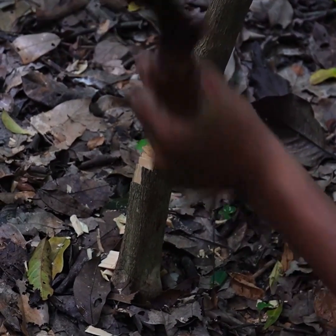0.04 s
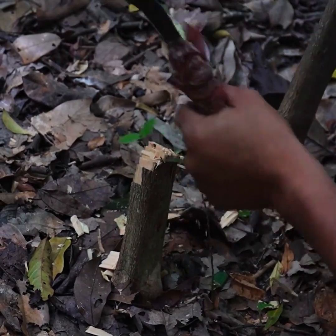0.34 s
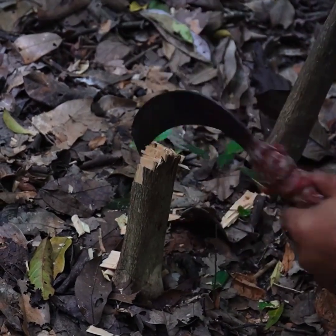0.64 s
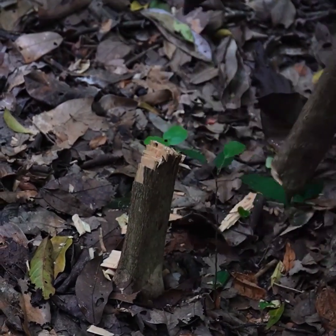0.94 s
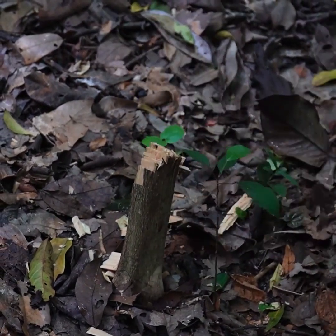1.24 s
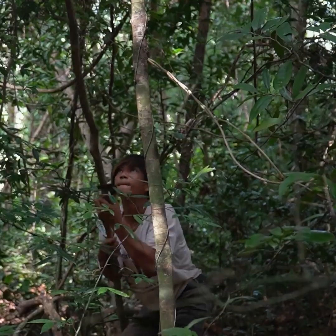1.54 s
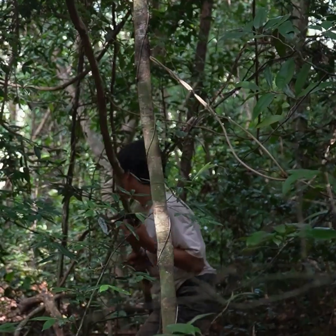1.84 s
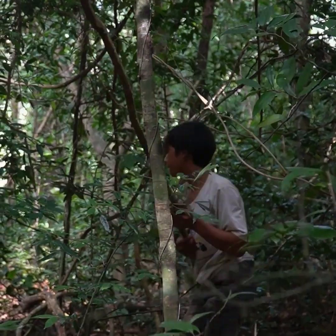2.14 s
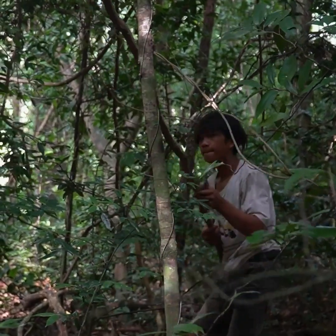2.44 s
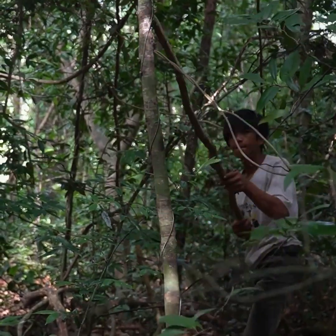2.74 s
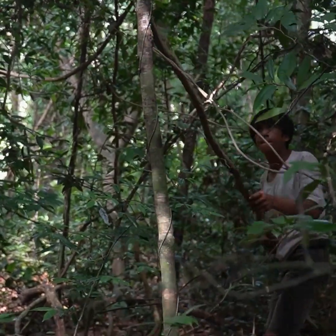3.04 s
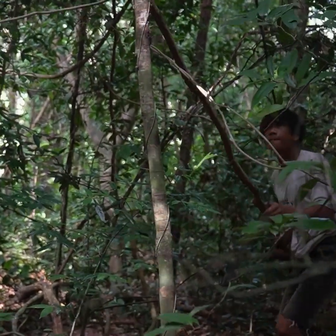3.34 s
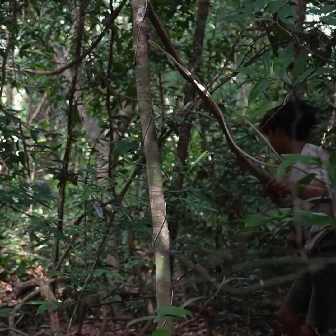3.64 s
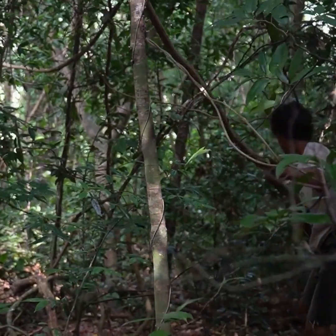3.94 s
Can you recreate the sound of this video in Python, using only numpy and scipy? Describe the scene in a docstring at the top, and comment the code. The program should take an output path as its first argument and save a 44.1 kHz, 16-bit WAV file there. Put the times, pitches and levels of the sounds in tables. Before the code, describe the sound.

A leafy sapling is dragged through forest undergrowth close by, rustling in swells with splintering snaps and a few dull knocks. Near the start a more distant bird gives two short whistles, and high insects hiss throughout.

```python
"""Leaves rustle and wood splinters close to the microphone: a chopped sapling is wrenched off its stump
and dragged through dense undergrowth. Its crown surges twice, a rush of leaf striking leaf, while twigs
brush past, snapping fibres ring the wood and the stem bumps the ground. Further into the forest a bird
whistles one rising and one falling note, and high insects hiss all around."""
import sys
import numpy as np
from scipy import signal
from scipy.fft import rfft, irfft
from scipy.io import wavfile

SR = 44100
rng = np.random.default_rng(int(sys.argv[2]) if len(sys.argv) > 2 else 0)


def log_audio(samples):
    """Write samples as a 16-bit WAV file to the path given in sys.argv[1]."""
    # one column per channel
    frames = np.atleast_2d(samples).T
    # limit to full scale, then quantise
    limited = np.clip(frames, -1, 1)
    pcm = np.round(limited * 32767).astype(np.int16)
    wavfile.write(sys.argv[1], SR, pcm)


N = 176400
T = np.arange(N) / SR
FREQS = np.maximum(np.fft.rfftfreq(N, 1 / SR), 1)

# stereo width of the nearby foliage: (frequency [Hz], side gain [dB])
LEAF_WIDTH = [(100, -23), (500, -12), (1400, -15.5), (2800, -12), (5000, -6.5), (14000, -2)]


def crown():
    """The crown dragged past, close up: countless leaves rush and tick, denser when pulled harder."""
    # rustle as the crown is pulled: (time [s], level [dB])
    pull_levels = [(0, -48), (.18, -47), (.25, -29), (.47, -30.5), (.7, -39.5), (.95, -42), (1.1, -33.5),
                   (1.24, -38), (1.39, -36.5), (1.54, -32), (1.66, -17), (1.745, -18.5), (1.775, -21.5),
                   (1.83, -19.5), (2.03, -27), (2.42, -32), (2.57, -34), (2.66, -30.5), (2.83, -35.5),
                   (3.0, -32.5), (3.12, -25), (3.27, -23), (3.33, -27), (3.58, -30.5), (3.72, -36),
                   (3.83, -36), (3.9, -34.5), (4, -38.5)]
    # tone of the leaves: (frequency [Hz], gain [dB])
    leaf_spectrum = [(40, -27), (100, -11), (200, -9.5), (300, -4.5), (420, -6), (650, -3), (1100, -3),
                     (1700, -1.5), (2600, -0.5), (4500, -3), (8000, -6), (12000, -9), (15500, -18.5)]
    crinkles_per_s, twig_ticks_per_s = 2500, 70  # at density 1
    rush_db, crinkle_db, twig_db = -3, -6.5, -15  # balance within the rustle
    flutter_db, band_wander_db, flutter_hz = 1.34, -0.07, 32
    pull = curve(pull_levels)
    white = rfft(rng.standard_normal((2, N)))
    octave = np.clip(np.floor(np.log2(FREQS / 250)), 0, 5)
    rush = sum(irfft(white * (octave == k), N) * from_db(band_wander_db * drift(flutter_hz))
               for k in range(6))
    density = np.sqrt(rms_one(pull))
    leaves = rms_one(crinkles(crinkles_per_s * density) / np.sqrt(density))
    twigs = rms_one(crinkles(twig_ticks_per_s * density) / np.sqrt(density))
    rustle = from_db(rush_db) * rms_one(rush) + from_db(crinkle_db) * leaves + from_db(twig_db) * twigs
    flutter = from_db(flutter_db * drift(flutter_hz))
    return widen(colour(rustle, leaf_spectrum), LEAF_WIDTH) * pull * flutter


def crinkles(per_s):
    """Leaf strikes leaf: brief ticks, each at a random pitch and place, as mid and side."""
    spread_db = 0.5
    sizes = from_db(spread_db * np.minimum(rng.exponential(1, N), 5)) * rng.choice([-1, 1], N)
    ticks = sizes * (rng.random(N) < per_s / SR)
    place, band = rng.standard_normal(N), rng.integers(0, 10, N)
    out = 0
    for k, hz in enumerate(np.geomspace(900, 14000, 10)):
        mid = ticks * (band == k)
        out = out + np.sqrt(hz) * rms_one(ring(np.array([mid, mid * place]), hz, t60=1.95 / hz))
    return rms_one(out)


def brushes():
    """Single leafy twigs swipe past the microphone in short, bright bursts of ticks."""
    # passing twigs: (time [s], length [s], level [dB])
    swipes = [(.196, .004, -29), (.333, 0.039, -22), (1.408, 0.024, -30), (1.576, 0.045, -27.5),
              (2.348, 0.02, -25.5), (2.393, 0.023, -28), (3.02, 0.028, -27.5), (3.365, 0.013, -28),
              (3.624, 0.021, -23), (3.866, 0.049, -31.5)]
    # tone of a swipe: (frequency [Hz], gain [dB])
    swipe_spectrum = [(200, -44), (1000, -1), (2800, 4), (6000, 4.5), (11000, 1.5), (15500, 3)]
    ticks = colour(crinkles(per_s=7000), swipe_spectrum)
    return widen(ticks, LEAF_WIDTH) * strokes(swipes, release_s=0.012)


def cracks():
    """Fibres fail in quick runs just right of centre: each snaps sharply and rings the wood."""
    # breaks, with levels as rms over 10 ms before panning and echoes: (time [s], length [s],
    # wood note [Hz], wood level [dB], wood t60 [s], snap centre [Hz], snap level [dB])
    breaks = [(0.2286, 0.0048, 2200, -21, 0.0017, 11000, -16.5),
              (0.293, 0.0052, 2400, -17.5, .0035, 6800, -22.5),
              (0.342, 0.00085, 2900, -25.5, 0.0064, 9000, -36), (0.349, 0.0056, 2630, -26, .004, 6000, -45),
              (0.3627, 0.00056, 2580, -25, .003, 6900, -28),
              (0.455, 0.0052, 1780, -23, 0.0048, 6100, -24.5), (.9110, 0.0042, 1430, -32, 0.02, 9700, -20),
              (0.9963, .0005, 2560, -34.5, .003, 4500, -45),
              (1.0486, 0.00087, 2400, -35.5, .003, 5000, -40),
              (1.2214, 0.0043, 1440, -32.5, 0.019, 6000, -50),
              (1.2876, 0.012, 2200, -31, 0.0079, 6000, -50), (1.475, 0.0056, 2150, -27, 0.0074, 10000, -31),
              (2.27, 0.0007, 2420, -53, .004, 6600, -21.5), (2.3945, .001, 2500, -39, .003, 6000, -30),
              (2.4346, 0.003, 2740, -43, 0.0028, 5800, -26.5),
              (2.5076, 0.0011, 1850, -34, 0.0026, 6000, -36), (2.645, .001, 2500, -43, .003, 6000, -33.5),
              (3.201, 0.0015, 2030, -20.5, 0.0064, 6000, -34),
              (3.2180, 0.0051, 2060, -22, 0.005, 4000, -42), (3.229, 0.0033, 1770, -26, 0.005, 4000, -45),
              (3.235, 0.0015, 1720, -19, 0.0044, 4000, -36), (3.5777, .001, 1930, -30.5, 0.0036, 6000, -39),
              (3.802, .001, 2410, -48, .003, 5960, -37.5), (3.8626, .0004, 1800, -51, .003, 8900, -19.5),
              (3.935, 0.0046, 1970, -32, 0.0021, 7000, -37)]
    # modes of the wood: (frequency over the note [ratio], gain [dB], t60 over the wood t60 [ratio])
    wood_modes = [(.38, -13.5, 0.65), (.76, -12, 0.45), (1, 2, 0.97), (1.37, -9, 0.34)]
    fibres_per_s, side_db, echo_db = 6000, -13.5, -6
    low_cut = signal.butter(2, 1180, "high", fs=SR, output="sos")
    out, t = np.zeros((2, N + SR)), T[:2048]
    to_10_ms = np.sqrt(.01 * SR / len(t))
    for start, length, wood_hz, wood_db, wood_t60, snap_hz, snap_db in breaks:
        fibres = rng.standard_normal((2, len(t))) * (rng.random(len(t)) < fibres_per_s / SR)
        mid, side = fibres * np.exp(-(t / length) ** 2)
        mid[0] = 2.5  # the first fibre goes hard
        fibres = stereo(mid, side * from_db(side_db))
        wood = sum(from_db(db) * ring(fibres, ratio * wood_hz, share * wood_t60)
                   for ratio, db, share in wood_modes)
        snap = signal.sosfilt(low_cut, ring(fibres, snap_hz, t60=0.00041) + fibres)
        crack = from_db(wood_db) * rms_one(wood) + from_db(snap_db) * rms_one(snap)
        i = int(start * SR)
        out[:, i:i + len(t)] += to_10_ms * crack
    direct = panned(out[:, :N], left_db=-2)
    return direct + from_db(echo_db) * tree_echoes(direct, t60=0.12)


def thuds():
    """The heavy stem bumps the ground and other branches: dull, broad knocks near the centre."""
    # bumps: (time [s], length [s], centre [Hz], level [dB])
    bumps = [(0.229, 0.0097, 170, -34), (0.291, 0.0049, 187, -33), (0.319, 0.083, 110, -45),
             (.749, 0.013, 302, -40), (1.476, 0.0048, 830, -29.5), (1.616, 0.047, 47.5, -42),
             (1.786, .06, 60, -46), (3.218, 0.021, 543, -34), (3.575, .006, 520, -36)]
    bandwidth_ratio, side_db = 1.4, -25
    out = 0
    for start, length, hz, db in bumps:
        t60 = np.log(1000) / (np.pi * bandwidth_ratio * hz)
        mid, side = ring(rng.standard_normal((2, N)), hz, t60)
        high_cut = signal.butter(2, 3 * hz, fs=SR, output="sos")
        body = signal.sosfilt(high_cut, stereo(mid, side * from_db(side_db)))
        out = out + rms_one(body) * strokes([(start, length, db)], release_s=0.0053)
    return out


def bird():
    """Two nearly pure whistles; the farther one is smeared by echoes among the trees."""
    # the rising whistle, then the falling one, each: (time [s], pitch [Hz], level [dB])
    notes = [
        [(.05, 2570, -47), (.082, 2720, -38), (.125, 2756, -30), (.164, 2800, -26.5), (.175, 2725, -28),
         (.184, 2810, -28), (.21, 2805, -23), (.228, 2650, -34)],
        [(.45, 2590, -26), (.48, 2586, -41), (.54, 2512, -31), (.565, 2586, -39), (.61, 2573, -37),
         (.655, 2493, -30.5), (.725, 2500, -51), (.765, 2420, -39.5), (.82, 2330, -43.5), (.88, 2330, -59)],
    ]
    # echo against direct sound: (near whistle [dB], far whistle [dB])
    echo_levels = [-10.5, 0.5]
    waver_hz, flutter_db = 11.1, 3.2
    out = 0
    for note, echo_db in zip(notes, echo_levels):
        times, hz, db = np.transpose(note)
        pitch = np.interp(T, times, hz) + waver_hz * drift(rate_hz=31)
        level = from_db(np.interp(T, times, db) + flutter_db * drift(rate_hz=40))
        singing = (T > times[0]) & (T < times[-1])
        song = np.sqrt(2) * level * singing * np.sin(2 * np.pi * np.cumsum(pitch) / SR)
        echo = from_db(echo_db)
        out = out + (song + echo * tree_echoes(song, t60=.3)) / np.hypot(1, echo)
    return out


def insects():
    """Many high stridulators around the microphone merge into a narrow, throbbing hiss."""
    # swell of the chorus: (time [s], level [dB])
    chorus_levels = [(0, -33.5), (.4, -34.5), (.72, -30.5), (.95, -33.5), (1.35, -33.5), (1.52, -29),
                     (2.0, -30), (2.45, -30), (2.85, -35), (3.2, -30), (3.55, -33), (3.8, -38), (4, -32.5)]
    # tone of the chorus: (frequency [Hz], gain [dB])
    chorus_spectrum = [(9000, -31.5), (10000, -6), (10170, -5), (10650, 1), (11150, -1), (11900, -4),
                       (13000, -8.5), (15500, -14.5)]
    side_db, throb_db = -7.5, 1.2
    mid, side = colour(rng.standard_normal((2, N)), chorus_spectrum)
    hiss = rms_one(stereo(mid, side * from_db(side_db)))
    return hiss * curve(chorus_levels) * from_db(throb_db * drift(rate_hz=40))


def air():
    """Still forest air behind everything: a quiet bed of noise, narrow in the bass and wide above."""
    # tone of the air: (frequency [Hz], gain [dB])
    air_spectrum = [(20, -25), (50, 2), (120, 0.5), (230, -7.5), (500, -15.5), (1200, -25), (2400, -4),
                    (3500, -12.5), (8000, -25.5), (15500, -9)]
    # its stereo width: (frequency [Hz], side gain [dB])
    air_width = [(30, -25), (120, -13), (500, 8), (2000, -3), (8000, 1)]
    return from_db(-42.5) * widen(colour(rng.standard_normal((2, N)), air_spectrum), air_width)


def tree_echoes(x, t60):
    """Diffuse echoes from trunks and leaves, different on each side of the microphone."""
    mid, side = rng.standard_normal((2, SR)) * from_db(-60 * T[:SR] / t60)
    tail = stereo(mid, side * .5)
    tail /= np.sqrt(np.sum(tail ** 2) / 2)
    return signal.fftconvolve(np.atleast_2d(x), tail, axes=1)[:, :N]


def ring(x, hz, t60):
    """One damped resonance that falls 60 dB in t60 seconds."""
    radius, angle = from_db(-60 / (t60 * SR)), 2 * np.pi * hz / SR
    return signal.lfilter([1, 0, -1], [1, -2 * radius * np.cos(angle), radius ** 2], x + 1e-18)


def strokes(rows, release_s, attack_s=0.0021):
    """Attack, hold and release for each (time [s], length [s], level [dB]) row."""
    return sum(from_db(db) * np.clip((T - start) / attack_s, 0, 1)
               * np.exp(-np.maximum(T - start - length, 0) / release_s) for start, length, db in rows)


def drift(rate_hz):
    """Random wander of rms 1, mostly slower than rate_hz."""
    return rms_one(irfft(rfft(rng.standard_normal(N)) / (1 + (FREQS / rate_hz) ** 2), N))


def curve(rows):
    """Gain along a (time [s], level [dB]) curve."""
    return from_db(np.interp(T, *np.transpose(rows)))


def colour(x, points):
    """Filter by a (frequency [Hz], gain [dB]) table."""
    hz, db = np.transpose(points)
    return irfft(rfft(x) * from_db(np.interp(np.log(FREQS), np.log(hz), db)), N)


def stereo(mid, side):
    """Left and right from mid and side."""
    return np.array([mid + side, mid - side])


def widen(mid_side, width):
    """Left and right at rms 1, with the side filtered by a width table."""
    mid, side = mid_side
    return rms_one(stereo(mid, colour(side, width)))


def panned(x, left_db):
    """Lean the sound by a left-minus-right level."""
    return np.array([x[0] * from_db(left_db / 2), x[1] * from_db(-left_db / 2)])


def from_db(db):
    """Decibels to gain."""
    return 10 ** (np.asarray(db) / 20)


def rms_one(x):
    """Scale to rms 1."""
    return x / np.sqrt(np.mean(x ** 2) + 1e-20)


def scene():
    """The sapling in front of the microphone, the forest around it."""
    # the crown starts a little to the right and comes to the centre: (time [s], left minus right [dB])
    crown_path = [(0, -1.2), (1.4, -1), (1.6, 0), (4, 0.5)]
    foliage = panned(crown() + brushes(), np.interp(T, *np.transpose(crown_path)))
    return foliage + cracks() + thuds() + bird() + panned(insects(), left_db=-1.4) + air()


def record(dry):
    """Behind the microphone, peaks stop at full scale and the top is cut steeply."""
    cutoff_hz = 15750
    high_cut = signal.ellip(12, .1, 80, cutoff_hz, fs=SR, output="sos")
    return signal.sosfilt(high_cut, np.clip(dry, -1, 1))


dry = scene()
out = record(dry)
log_audio(out)
```